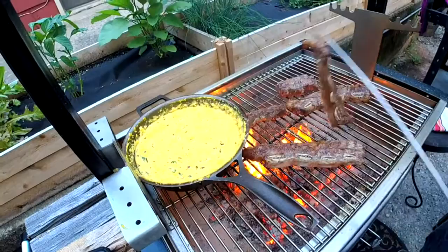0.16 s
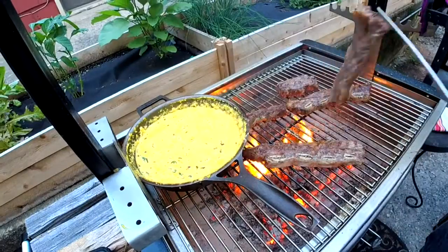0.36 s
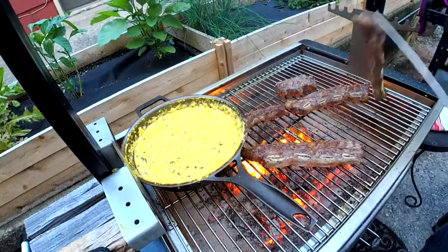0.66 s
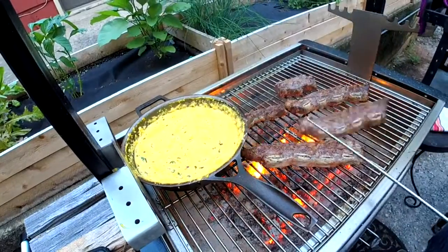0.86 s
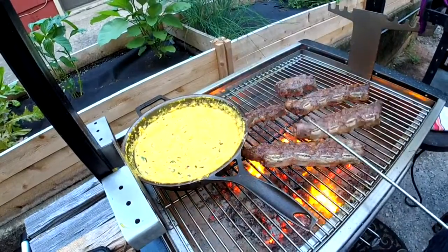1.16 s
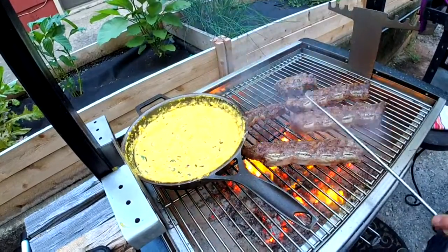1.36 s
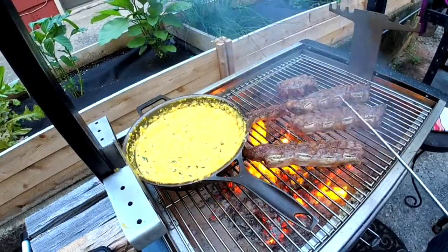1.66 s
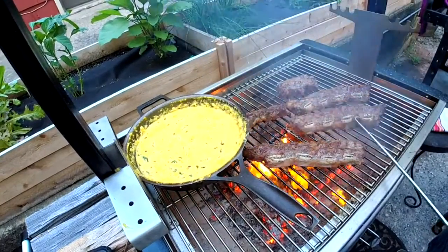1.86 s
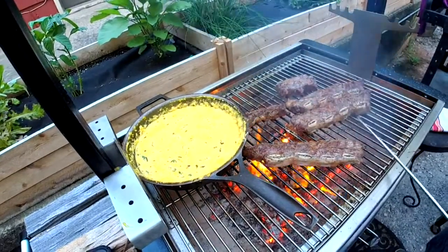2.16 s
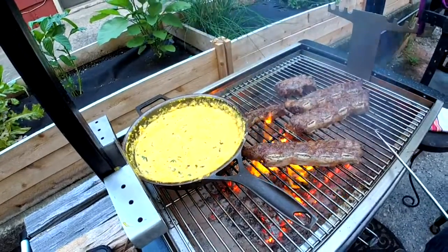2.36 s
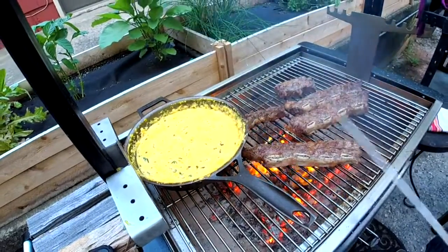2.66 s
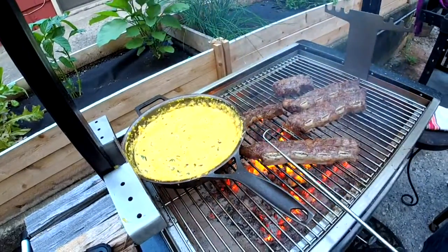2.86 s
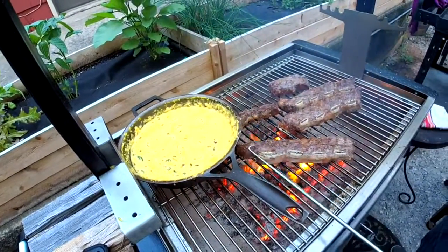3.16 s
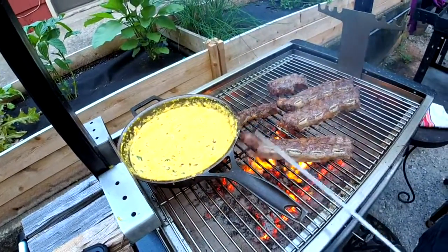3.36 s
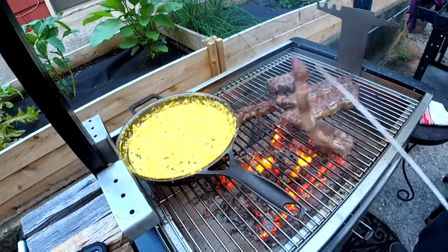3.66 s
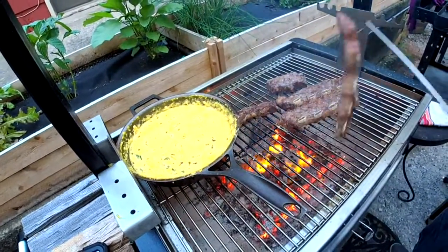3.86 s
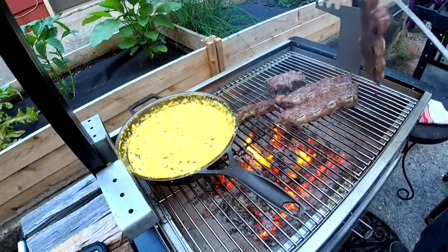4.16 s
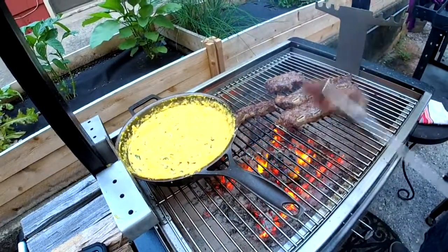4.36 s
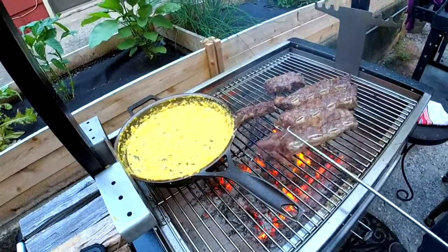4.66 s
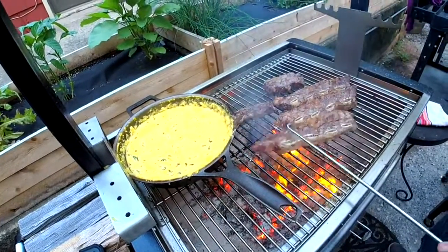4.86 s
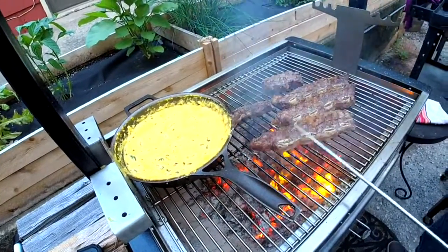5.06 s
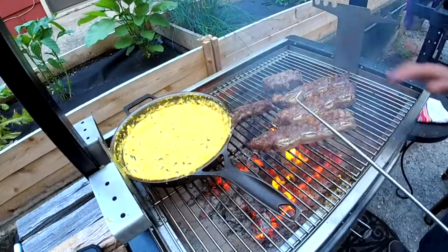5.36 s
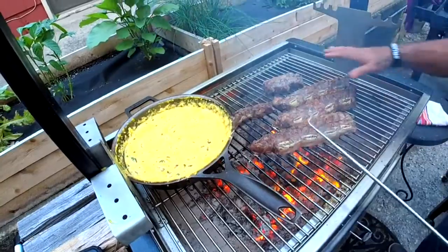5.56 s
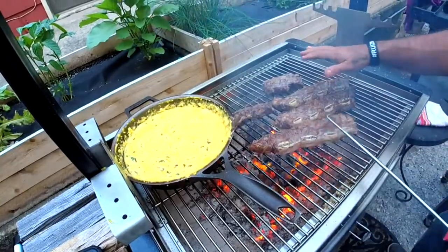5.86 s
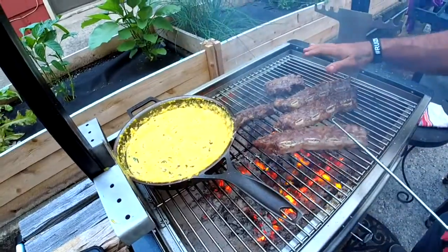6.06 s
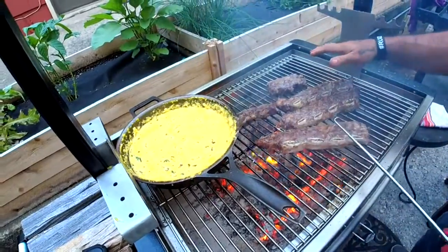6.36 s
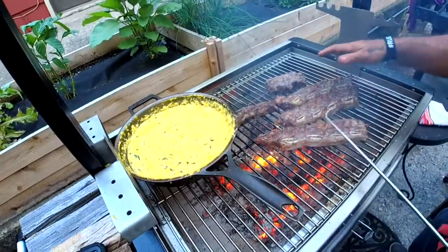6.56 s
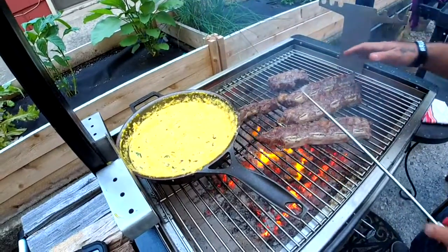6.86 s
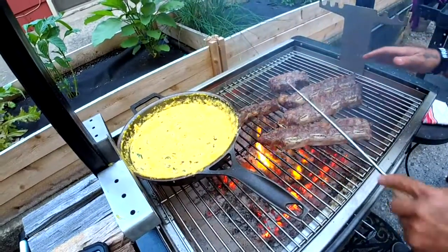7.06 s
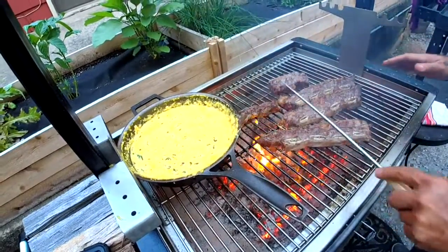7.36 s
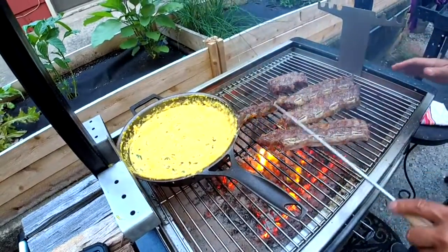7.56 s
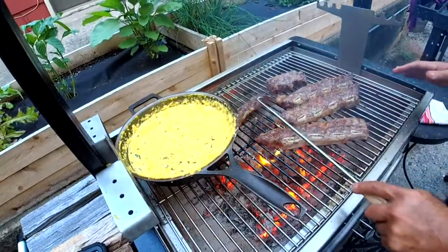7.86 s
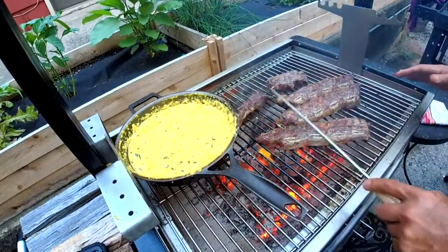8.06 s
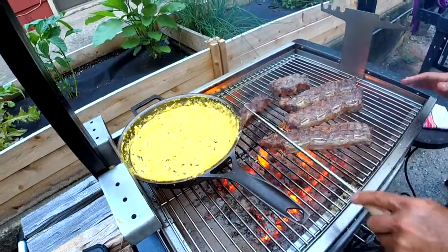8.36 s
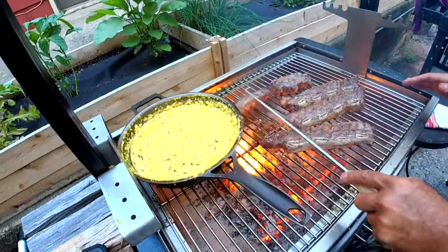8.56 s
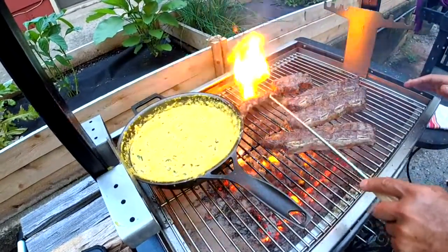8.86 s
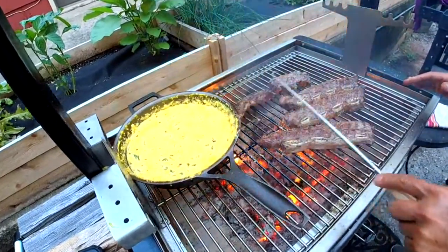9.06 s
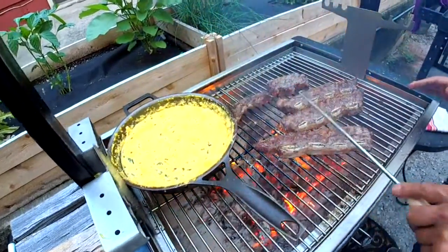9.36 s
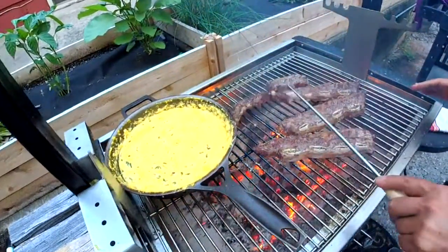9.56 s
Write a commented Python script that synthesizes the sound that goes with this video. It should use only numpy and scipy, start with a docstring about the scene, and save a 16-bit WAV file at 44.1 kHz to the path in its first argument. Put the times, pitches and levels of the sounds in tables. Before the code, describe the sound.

Close outdoor grill: soft flame rush and bubbling fat hiss, constant fine crackle, loud snapping pops, and two strips slapping down onto ringing bars.

```python
"""Strips of meat sizzle on a steel grate over glowing coals: fat-bubble grains and steam noise, with short surges.
Flames are coloured noise plus firebox modes; spitting fat and popping embers are impulses with echoes.
Two strips are flipped: noise bursts make squelch, bar ring and thud; decaying sines bump the grate.
Some sharp pops overload the small two-port microphone: leaking offsets, heard as dull thumps."""
import sys
import numpy as np
from scipy import signal
from scipy.fft import rfft, irfft, next_fast_len
from scipy.io import wavfile
from scipy.ndimage import uniform_filter1d

SR = 44100
rng = np.random.default_rng(int(sys.argv[2]) if len(sys.argv) > 2 else 0)


def unload_audio(sound):
    """Save the sound as a 16-bit wav file, at the path given as the first command line argument."""
    columns = np.transpose(np.atleast_2d(sound))
    # keep every value between -1 and 1, then stretch to whole-number steps
    steps = np.round(np.clip(columns, -1, 1) * 32767)
    wavfile.write(sys.argv[1], SR, steps.astype(np.int16))


N = 428211
TIME = np.arange(N) / SR
PADDED = next_fast_len(N + SR // 10, real=True)
FREQS = np.maximum(np.fft.rfftfreq(PADDED, 1 / SR), 1)


def from_db(db):
    """Decibels to amplitude gain."""
    return 10 ** (np.asarray(db) / 20)


def rms_one(x):
    """Scale to unit rms."""
    return x / np.sqrt(np.mean(x ** 2) + 1e-20)


def in_time(rows):
    """Interpolate a time table at every sample."""
    return np.interp(TIME, *np.transpose(rows))


def in_hz(rows):
    """Interpolate a frequency table over log frequency."""
    hz, values = np.transpose(rows)
    return np.interp(np.log(FREQS), np.log(hz), values)


def drift(rate_hz):
    """Two-pole low-passed noise, unit rms, computed every 40 samples."""
    step = 40
    r = np.exp(-2 * np.pi * rate_hz * step / SR)
    noise = rng.standard_normal(N // step + 2002)
    slow = signal.lfilter([1], [1, -2 * r, r * r], noise)[2000:]   # drop the start-up
    return np.interp(np.arange(N) / step, np.arange(len(slow)), rms_one(slow))


def resonance(x, hz, width_hz):
    """Two-pole resonance, unit peak gain."""
    r = np.exp(-np.pi * width_hz / SR)
    zeros = np.array([1, 0, -1]) * (1 - r * r) / 2
    poles = [1, -2 * r * np.cos(2 * np.pi * hz / SR), r * r]
    return signal.lfilter(zeros, poles, x + 1e-18)


def ringing(x, modes):
    """Parallel resonances of one body."""
    return sum(from_db(db) * resonance(x, hz, width_hz) for hz, width_hz, db in modes)


def white():
    """Two independent noises."""
    return rng.standard_normal((2, N))


def grains(per_s, size_db):
    """Two independent streams of random-sign impulses, mostly small, a few large; unit rms."""
    size = from_db(size_db * np.minimum(rng.exponential(1, (2, N)), 6))
    signed = size * rng.choice([-1, 1], (2, N))
    return rms_one(signed * (rng.random((2, N)) < per_s / SR))


def swell_and_fade(s, swell_s, fade_s):
    """Exponential rise to 1 at time s, then exponential decay."""
    return np.exp(-np.minimum(np.maximum((s - TIME) / swell_s, (TIME - s) / fade_s), 20))


def clicks(times_s, level_db):
    """One impulse at each time."""
    out = np.zeros(N)
    index = np.clip(np.round(times_s * SR).astype(int), 0, N - 1)
    np.add.at(out, index, from_db(level_db))
    return out


# left-right likeness of the sound field: (frequency [Hz], likeness [0-1])
FIELD_LIKENESS = [(30, 1), (1000, 0.97), (2200, 1), (3700, 1), (6000, 0.88), (9000, 0.78), (11000, 0.25),
                  (13000, 0.15), (16000, 0.68)]


def spread(pair, colour=None):
    """Mix two independent signals to left and right with frequency-dependent correlation."""
    mid, side = rfft(pair, PADDED)
    alike = np.clip(in_hz(FIELD_LIKENESS), 0, 1)
    both = np.sqrt((1 + alike) / 2) * mid + np.sqrt((1 - alike) / 2) * side * [[1], [-1]]
    gain = 1 if colour is None else from_db(in_hz(colour))
    return irfft(both * gain, PADDED)[:, :N]


def scatter(impulses, t60_s, diffuse=0.26):
    """Echoes from firebox and bars: noise under the impulses' decaying energy, 0.5 ms late."""
    r = from_db(-120 / (t60_s * SR))   # energy falls 60 dB in t60_s
    energy = signal.lfilter([1 - r], [1, -r], impulses ** 2 + 1e-18)
    noise = rms_one(spread(white()) + diffuse * white())
    return noise * np.sqrt(np.roll(energy, SR // 2000))


# boiling of fat on the meat: (time [s], relative level [dB])
BOIL = [(0.0, -52), (0.62, -56), (0.89, -53), (1.08, -44.5), (1.81, -51), (2.32, -47.5), (2.78, -53.5),
        (3.05, -53.5), (3.46, -48), (3.86, -53), (4.49, -57), (4.62, -46.5), (4.84, -44.5), (5.76, -53),
        (6.11, -44.5), (6.44, -51.5), (7.11, -51), (7.68, -54), (7.9, -49.5), (8.25, -52), (8.74, -45),
        (9.14, -52.5), (9.44, -53.5), (9.71, -47)]
# short surges of sizzle, two of them as meat lands on the steel: (time [s], relative level [dB])
SURGES = [(0.04, -51), (0.91, -39.5), (3.21, -50), (4.51, -40.5), (5.5, -48), (5.7, -51), (6.59, -42.5),
          (6.84, -47), (7.88, -48), (9.52, -43.5)]
# sizzle spectrum: (frequency [Hz], relative density [dB])
SIZZLE_SPECTRUM = [(400, -32), (1200, -30), (2000, -5), (3500, -4), (6000, -1), (8000, 3), (9500, -1),
                   (11000, -4), (13200, -5), (15000, -11), (16000, -49)]
SURGE_SWELL_S, SURGE_FADE_S = 0.024, 0.065


def sizzle(steam_db=0.5, flutter_db=1.0, level_db=8.5, surge_db=7.5):
    """Bursting fat bubbles over smooth steam noise, with short surges in level."""
    bubbles = grains(per_s=3500, size_db=3.0)
    hiss = rms_one(spread(bubbles + from_db(steam_db) * white(), SIZZLE_SPECTRUM))
    boil = from_db(in_time(BOIL) + level_db)
    surges = sum(from_db(db + surge_db) * swell_and_fade(s, SURGE_SWELL_S, SURGE_FADE_S)
                 for s, db in SURGES)
    return hiss * np.hypot(boil, surges) * from_db(flutter_db * drift(17))


# flame rush spectrum: (frequency [Hz], relative density [dB])
FLAME_SPECTRUM = [(20, -2), (60, 0.5), (100, -2.5), (165, 2.5), (260, -2), (370, -6), (520, -2.5),
                  (670, -8), (900, -5.5), (1200, -13), (2000, -13.5), (4000, -17.5), (12000, -24)]
# firebox cavity modes stirred by flames: (frequency [Hz], width [Hz], relative level [dB])
FIREBOX_MODES = [(126, 9.4, 4), (169.7, 9, 1.5), (250.7, 35, -1), (541, 138, -6.5), (739, 22, -3.5),
                 (914, 105, -8.5), (1129, 68, -7.5), (1360, 45, -9)]
# running fat catching fire: (time [s], rise [dB])
FLARE_UPS = [(1.05, 4), (2.05, 1.5), (4.6, 1.5), (7.25, 1), (8.72, 2)]
FLARE_SWELL_S, FLARE_FADE_S = 0.29, 0.35


def fire(rest_db=-48.5, flicker_db=0.98, box_db=-3.5):
    """Flickering flame noise plus hollow firebox modes; burning fat makes it flare."""
    rush = rms_one(spread(white(), FLAME_SPECTRUM))
    hollow = from_db(box_db) * rms_one(ringing(spread(white()), FIREBOX_MODES))
    flare_db = sum(db * swell_and_fade(s, FLARE_SWELL_S, FLARE_FADE_S) for s, db in FLARE_UPS)
    return (rush + hollow) * from_db(rest_db + flare_db + flicker_db * drift(9.3))


# bursting embers and fat: (time [s], relative level [dB], depth [0 dry snap, .5 wet spit, 1 woody knock])
POP_EVENTS = [(0.0549, -1, 0.41), (0.1761, -5, .2), (0.2879, -2.5, .3), (0.5825, -0.5, 0.22),
              (1.2342, -1.5, 0.85), (1.3619, -9, 0.79), (1.5105, 1.5, 0.34), (1.7905, 1, .05),
              (1.8632, 2, 0.43), (1.8713, -2.5, .25), (2.0965, -2.5, 0.39), (2.2248, -2.5, .15),
              (2.3218, -0.5, 0.39), (2.4239, -2, 0.33), (2.6083, -1, 0.39), (2.703, -10, .2),
              (2.9899, -1, 0.82), (3.2416, 4.5, 0.99), (3.403, -4, .1), (3.5475, 1.5, .05),
              (3.8395, 7, .02), (4.188, -1, .02), (4.418, -3, .15), (4.428, -4, .2), (4.8235, -3.5, .1),
              (5.262, -1, .1), (5.3926, 3.5, 0.4), (5.579, 4.5, .1), (5.7237, -1, .05), (6.1153, -5, .1),
              (6.2336, 7, 1), (6.2934, -2, .3), (6.5817, 2, .2), (6.6682, -2.5, .25), (6.8263, -2.5, .15),
              (6.843, 6.5, .05), (6.926, -2.5, .05), (7.0605, -1, .02), (7.1213, 3, .05),
              (7.4989, 13, 0.42), (7.6499, 3.5, 0.26), (7.9343, -1, 0.75), (8.0183, -4.5, .1),
              (8.0746, -10, .55), (8.2881, 0, 0.34), (8.3228, -0.5, .25), (8.3924, -8.5, .45),
              (8.7298, 0.5, .05)]
# pop make-up: (depth [0-1], wet spit re pop [dB, before trim], woody body re pop [dB, before trim])
POP_PARTS = [(0, -32, -41), (.5, 3, -24), (1, -2, 6)]
FLURRY_S, FLURRY_WIDTH_S, FLURRY_DB = 7.33, 0.18, 10.5   # bolder ticks while the meat is poked
ECHO_GROWTH = 0.41   # extra echo dB per pop dB


def crackle(ticks_per_s=70, tick_db=-25.5, tick_size_db=5.0, tick_top_db=-6.5, tick_tail_db=-4.5,
            tick_spit_db=-15.5, crack_db=2.5, tail_db=-3.5, tail_t60_s=0.02, far_db=-7.0, far_t60_s=0.055,
            spit_db=-5.0, body_db=1.5, hollow_db=-3.5, pan_db=2.0, lag_samples=0.81):
    """Pops and faint ticks: impulse crack, grill echoes, resonant wet spit and woody body."""
    s, level, depth = np.transpose(POP_EVENTS)
    depths, *parts = np.transpose(POP_PARTS)
    spit, body = (level + np.interp(depth, depths, part) for part in parts)

    chance = rng.random((int(ticks_per_s * N / SR), 2))
    tick_s = chance[:, 0] * N / SR
    flurry_db = FLURRY_DB * np.exp(-((tick_s - FLURRY_S) / FLURRY_WIDTH_S) ** 2)
    tick_level = tick_db + flurry_db - tick_size_db * np.log(chance[:, 1])
    ticks = clicks(tick_s, np.minimum(tick_level, tick_top_db))

    echoes = clicks(s, level * (1 + ECHO_GROWTH) + tail_db) + from_db(tick_tail_db) * ticks
    cracks = clicks(s, level + crack_db) + ticks
    snap = cracks + scatter(echoes, tail_t60_s) + from_db(far_db) * scatter(echoes, far_t60_s)

    spits = clicks(s, spit + spit_db) + from_db(tick_spit_db) * ticks
    wet = resonance(spits + 1.96 * scatter(spits, t60_s=0.036), hz=4270, width_hz=2900)

    knocks = clicks(s, body + body_db)
    knock_echo = knocks + 0.63 * scatter(knocks, t60_s=0.04)
    woody = resonance(resonance(knock_echo, hz=850, width_hz=1130), hz=1100, width_hz=4700)
    hollow = from_db(hollow_db) * resonance(knocks, hz=233, width_hz=48)   # firebox answer

    pops = resonance(snap, hz=8040, width_hz=3730) + wet - woody + hollow
    # wandering position on the grate: level and arrival differ by side
    sides = np.array([[.5], [-.5]])
    panned = pops * from_db(pan_db * sides * drift(18))
    return panned + lag_samples * sides * drift(8) * np.gradient(pops, axis=1)


# meat meeting the grate: (time [s], wet squelch [dB], bar ring [dB], thud [dB])
SLAP_EVENTS = [(0.912, -29, -27, -37), (4.512, -37, -27, -36), (4.617, -24, -54, -46)]
# grate modes: (frequency [Hz], width [Hz], relative level [dB])
GRATE_MODES = [(490, 40, -5), (774, 120, -20), (1060, 96, -10), (1546, 13, 12), (1970, 1000, -0.5),
               (2920, 44, 7.5), (3480, 66, 9.5), (3940, 26, 6), (5670, 65, -4), (5720, 53, -14),
               (7030, 120, 6.5)]
# thud spectrum: (frequency [Hz], relative density [dB])
THUD_SPECTRUM = [(25, -17), (80, -13), (135, 2), (220, 1.5), (350, -9.5), (520, -1.5), (1000, -9),
                 (2500, -11.5), (8000, -26)]
SLAP_SWELL_S, SLAP_FADE_S = 0.009, 0.029
BRUSH_LEAD_S, BRUSH_SQUELCH_DB, BRUSH_RING_DB = 0.039, -38, -39   # hanging end touches first
THUD_LAG_S, THUD_SWELL_S, THUD_FADE_S = 0.044, 0.054, 0.054   # weight settles after


def slaps():
    """Floppy meat brushes, slaps, settles: juice spatter, ringing bars, low-frequency thud."""
    squelch = ring = thud = 0
    for s, squelch_db, ring_db, thud_db in SLAP_EVENTS:
        brush = swell_and_fade(s - BRUSH_LEAD_S, SLAP_SWELL_S, SLAP_FADE_S)
        slap = swell_and_fade(s, SLAP_SWELL_S, SLAP_FADE_S)
        settle = swell_and_fade(s + THUD_LAG_S, THUD_SWELL_S, THUD_FADE_S)
        squelch = squelch + from_db(BRUSH_SQUELCH_DB) * brush + from_db(squelch_db) * slap
        ring = ring + from_db(BRUSH_RING_DB) * brush + from_db(ring_db) * slap
        thud = thud + from_db(thud_db) * settle
    spatter = spread(grains(per_s=8400, size_db=3.0))
    wet = rms_one(resonance(resonance(spatter, hz=3580, width_hz=4300), hz=3680, width_hz=7100))
    bars = rms_one(ringing(spread(white()), GRATE_MODES))
    weight = rms_one(spread(white(), THUD_SPECTRUM))
    return squelch * wet + ring * bars + thud * weight


# meat flopping over or nudged on the grate: (time [s], pitch [Hz], level before decay [dB])
BUMP_EVENTS = [(1.006, 135, -44), (4.535, 210, -28), (4.605, 132, -31), (8.116, 166.5, -28)]
REBOUND_S, REBOUND_DB = 0.034, 1   # second landing of the slack strip


def bumps(t60_s=0.093, contact_s=0.0044, jitter_rad=0.52):
    """Loaded grate flexes under each soft blow and rebound: decaying sine, phase-jittered."""
    out = np.zeros(N)
    jitter = jitter_rad * drift(150)   # random phase jitter roughens the bump tone
    for s, hz, level_db in BUMP_EVENTS:
        for start_s, db in ((s, level_db), (s + REBOUND_S, level_db + REBOUND_DB)):
            age = np.maximum(TIME - start_s, 0)
            envelope = from_db(db - 60 * age / t60_s) * (1 - np.exp(-age / contact_s))
            out += envelope * np.sin(2 * np.pi * hz * age + jitter)
    return out


# capsule overloads by pops: (time [s], left pressure step [dB], right pressure step [dB])
OVERLOAD_EVENTS = [(1.7909, -48, -14.5), (5.5790, -39, -0.5), (6.8430, -3, -10.5), (7.5130, -50, -12.5),
                   (8.7298, 0, -4.5)]


def overloads(leak_hz=9.9, coupling_hz=0.41):
    """Overloaded capsule jumps to an offset that leaks away, then a high-pass: dull thump."""
    s, left_db, right_db = np.transpose(OVERLOAD_EVENTS)
    kicks = np.array([clicks(s, left_db), clicks(s, right_db)])
    jump = signal.lfilter([1], [1, -np.exp(-2 * np.pi * leak_hz / SR)], kicks + 1e-18)
    return signal.sosfilt(signal.butter(1, coupling_hz, "high", fs=SR, output="sos"), jump)


# left port's phase lead: (frequency [Hz], lead [rad])
LEFT_LEAD = [(20, 0), (2500, .02), (5000, .18), (7000, .55), (9000, .9), (11000, 1.55), (13000, 2.6),
             (16000, 3.2)]
# left port over right: (frequency [Hz], level difference [dB])
LEFT_OVER_RIGHT = [(20, -1.5), (2000, -0.5), (5000, -0.5), (7000, -1), (9000, 1.5), (11000, 4.5),
                   (13000, 3), (16000, 3)]


def scene():
    """Grill at two microphone ports, left leading and louder in the high treble; overloads bypass them."""
    grill = sizzle() + fire() + crackle() + slaps() + bumps()
    lead_rad, balance_db = in_hz(LEFT_LEAD), in_hz(LEFT_OVER_RIGHT)
    left = from_db(balance_db / 2)
    right = from_db(-balance_db / 2) * np.exp(-1j * lead_rad)
    return irfft(rfft(grill, PADDED) * np.array([left, right]), PADDED)[:, :N] + overloads()


def limiter(x, duck_db=8.5, release_db_per_s=108.0, react_s=0.00186):
    """Per-channel gain cut shortly after the 30-sample mean passes 0.8; linear dB recovery."""
    hot = np.abs(uniform_filter1d(x, size=30, axis=1)) > .8
    ramp_db = release_db_per_s * TIME
    cut_db = np.maximum.accumulate(duck_db * hot + ramp_db, axis=1) - ramp_db
    late_cut_db = np.roll(cut_db, int(react_s * SR), axis=1)
    return x * uniform_filter1d(from_db(-late_cut_db), size=60, axis=1)


PORT_PATH_HZ = 9620   # inverse delay between successive paths
CUTOFF_HZ = 16000


def record(dry):
    """Four evenly delayed paths comb the sound; then limiter, peak rounding, offset, low-pass."""
    paths = np.mean([np.exp(-2j * np.pi * FREQS * k / PORT_PATH_HZ) for k in range(4)], axis=0)
    combed = irfft(rfft(dry, PADDED) * paths, PADDED)[:, :N]
    held = limiter(combed)
    rounded = held / (1 + held ** 16) ** (1 / 16)
    offset = np.array([[-.013], [-.005]])
    low_pass = signal.ellip(8, .2, 80, CUTOFF_HZ, fs=SR, output="sos")
    return signal.sosfilt(low_pass, rounded + offset)


dry = scene()
out = record(dry)
unload_audio(out)
```